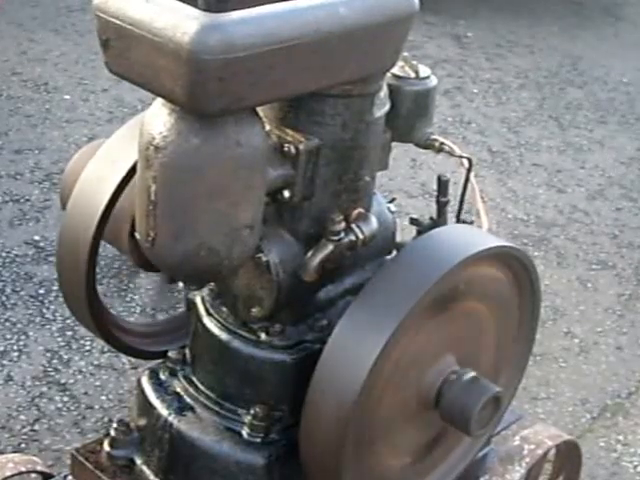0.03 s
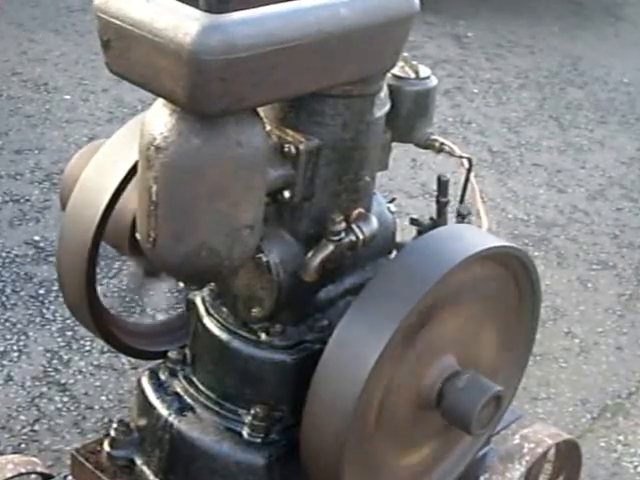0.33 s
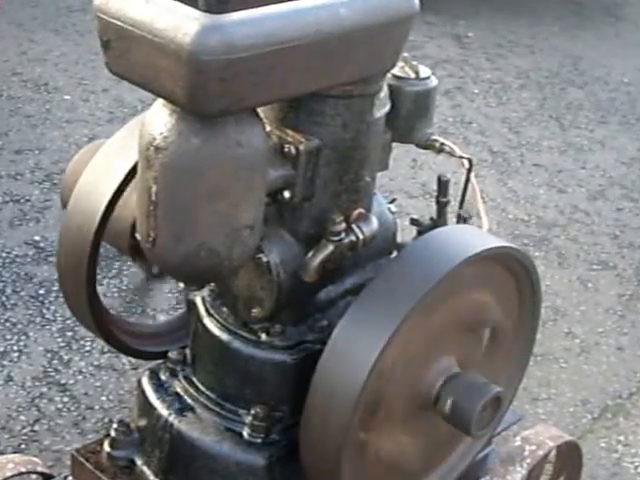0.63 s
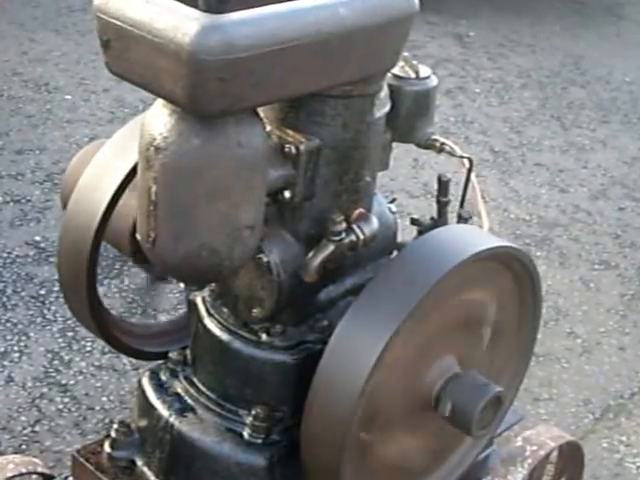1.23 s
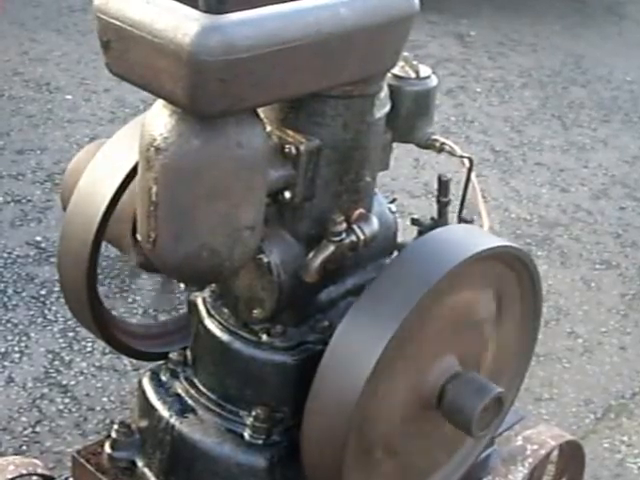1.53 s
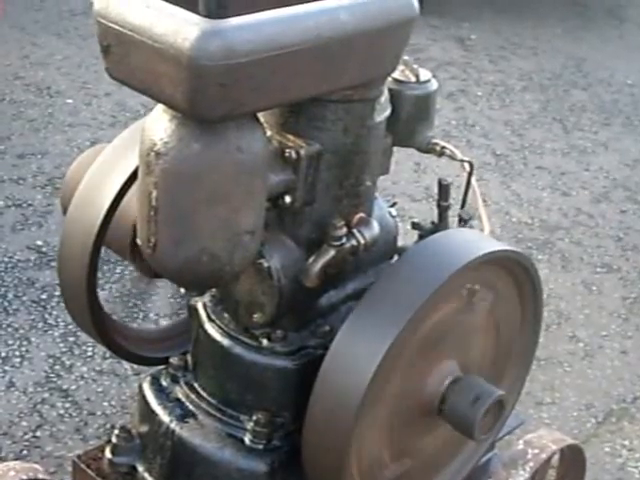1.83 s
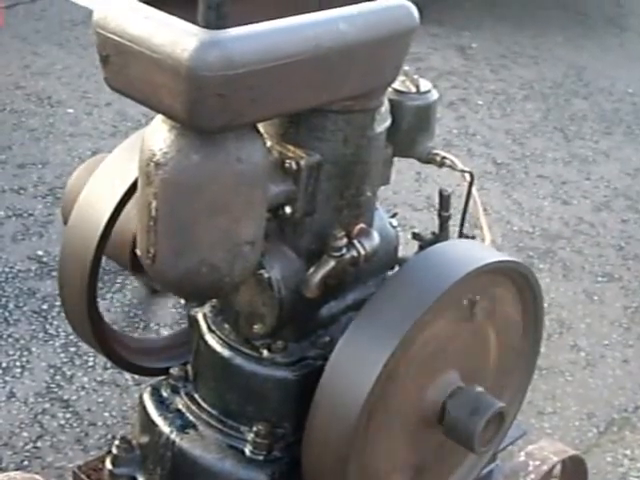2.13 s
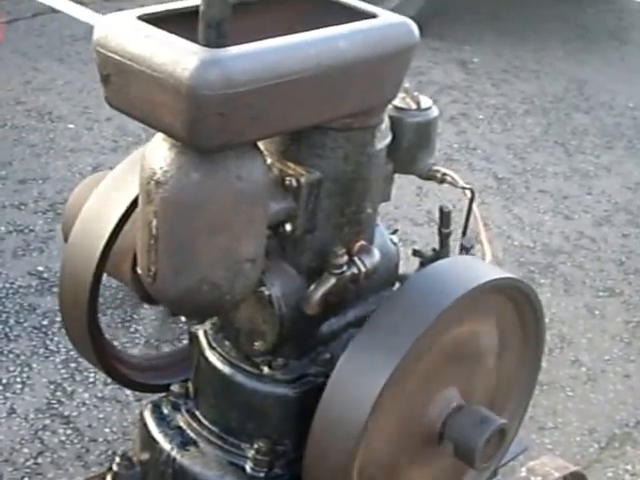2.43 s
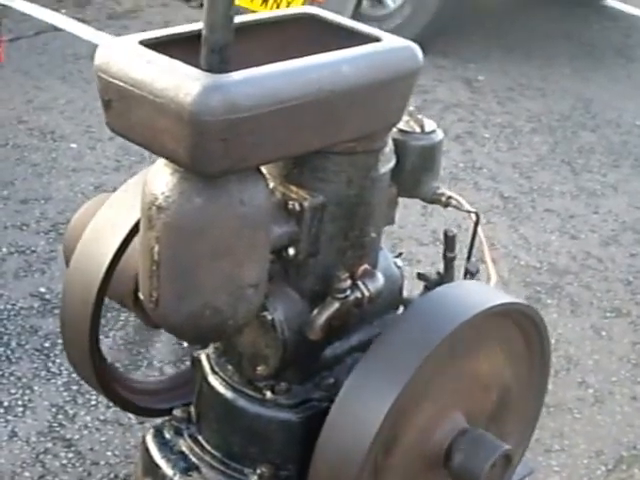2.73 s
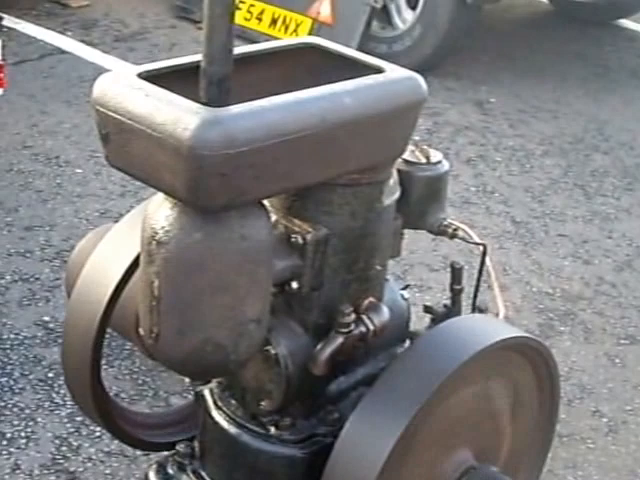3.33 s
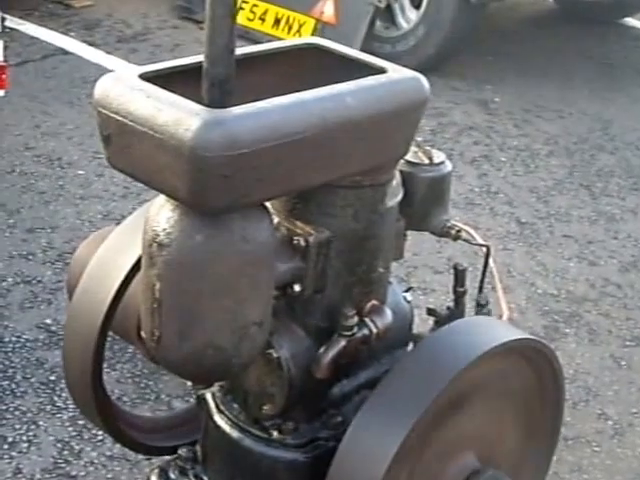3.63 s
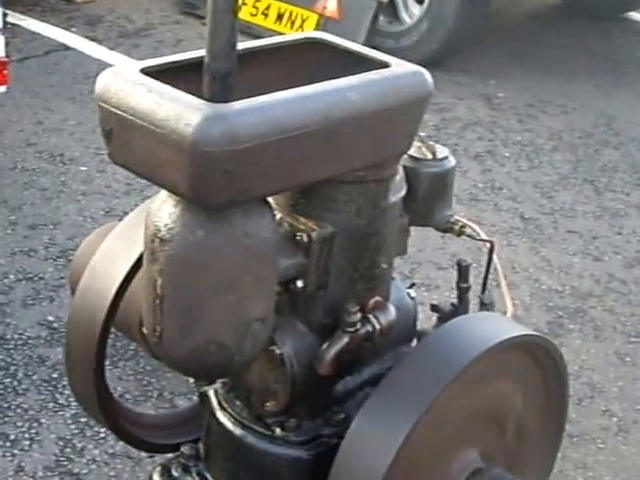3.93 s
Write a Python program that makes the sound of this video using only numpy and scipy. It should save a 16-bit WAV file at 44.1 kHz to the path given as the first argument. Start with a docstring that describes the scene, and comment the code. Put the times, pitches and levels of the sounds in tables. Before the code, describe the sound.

An old stationary engine chugs quickly close by, ticking and clanking, with occasional harsh bangs.

```python
"""An old single-cylinder stationary engine runs close by on the tarmac of a showground.
Each turn displaces air in a low gulp, with a linkage clack, a sharp valve tick and a little hiss.
Loose metal knocks on some turns, and now and then a firing excites the iron castings with a harsh bang.
A second engine putts faster a little way off, echoing from parked vehicles over the din of the show.
The bangs overload the microphone."""
import sys
import numpy as np
from scipy import signal
from scipy.fft import rfft, irfft
from scipy.io import wavfile

SR = 44100
rng = np.random.default_rng(int(sys.argv[2]) if len(sys.argv) > 2 else 0)


def put_to_file(sound):
    """Save the sound as 16-bit audio at rate SR, in the file named by the first command-line argument."""
    columns = np.atleast_2d(sound).T  # one column per channel
    safe = np.clip(columns, -1, 1)
    whole_steps = np.round(safe * 32767)
    wavfile.write(sys.argv[1], SR, whole_steps.astype(np.int16))


N = 176400
TIME = np.arange(N) / SR

# turns of the near engine: (time [s], gulp level [dB], valve tick level [dB])
TURNS = [(0.039, 0.5, -1.5), (0.164, -4, -2), (0.287, 1, 1.5), (0.413, -1, 1), (0.542, 2.5, 0),
         (0.673, -0.5, -2.5), (0.792, 2, -2), (0.91, 5.5, 3.5), (1.037, 5, -1.5), (1.155, 1.5, -3),
         (1.274, -2, 0.5), (1.395, -0.5, -1), (1.520, 3.5, -3), (1.646, 0, -1.5), (1.761, 2, 7.5),
         (1.889, -1, -2), (2.011, 2, -1), (2.131, -5, -1.5), (2.243, 2, 4), (2.357, 5, 2), (2.481, 5.5, 3),
         (2.593, -8, -3), (2.709, 3, -2.5), (2.827, 3.5, -2.5), (2.947, -2.5, -1), (3.068, 1.5, -0.5),
         (3.192, 1.5, -1), (3.318, 4, -2.5), (3.449, -0.5, 0), (3.578, 0.5, -0.5), (3.712, 1, -3),
         (3.83, 0.5, 3.5), (3.955, 2.5, -5)]
# spectrum of a firing's bark and of the linkage clack: (frequency [Hz], level [dB])
BARK_SPECTRUM = [(150, -16.5), (400, 0.5), (540, 5.5), (830, -3.5), (990, 6), (1350, 0), (2000, 2.5),
                 (3000, 4), (6000, -15)]
# spectrum of a puff of gas: (frequency [Hz], level [dB])
CHUFF_SPECTRUM = [(200, 5), (650, -2.5), (1200, 3.5), (2000, -5), (3000, -4.5), (6000, -25)]


def from_db(db):
    """Amplitude grows tenfold for every 20 dB."""
    return 10 ** (np.asarray(db) / 20)


def unit_rms(x):
    """Normalisation to unit mean power."""
    return x / np.sqrt(np.mean(x ** 2) + 1e-20)


def drift(hz):
    """Low-pass filtered noise gives a random fluctuation of unit rms."""
    lowpass = signal.butter(2, hz, fs=SR, output="sos")
    return unit_rms(signal.sosfilt(lowpass, rng.standard_normal(N + SR))[SR:])


def noise(spectrum, grain_db=3, top_hz=6520):
    """Random amplitude modulation makes noise grainy; spectral shaping colours it, at unit rms."""
    hz, db = np.transpose(spectrum)
    f = np.maximum(np.arange(N // 2 + 1) * SR / N, 1)
    grains = rng.standard_normal(N) * from_db(grain_db * drift(400))
    gain = from_db(np.interp(np.log(f), np.log(hz), db)) * (f > 10) * (f < top_hz)
    return unit_rms(irfft(rfft(grains) * gain, N))


def bursts(times, dbs, attack_s, hold_s, decay_s):
    """Incoherent events add in power; each envelope rises, holds and decays exponentially."""
    power = np.zeros(N)
    for s, db in zip(times, dbs):
        start = max(int(s * SR), 0)
        age = np.maximum(TIME[start:start + SR // 2] - s, 0)
        rise = np.minimum(age / attack_s, 1)
        fall = np.exp(-np.maximum(age - attack_s - hold_s, 0) / decay_s)
        power[start:start + len(age)] += (from_db(db) * rise * fall) ** 2
    return np.sqrt(power)


def iron_castings(force, ring_db):
    """Modal resonance: a force is heard directly and through the damped modes of the castings."""
    # modes of the iron: (frequency [Hz], bandwidth [Hz], level [dB])
    modes = [(745, 17, -1.5), (980, 65, 0.5), (1219, 61, 4.5), (1658, 14, 12.5), (1942, 52, 3),
             (2182, 30, 5), (2620, 91, 1), (3170, 26, -6), (4220, 64, -1), (4544, 35, 1.5), (4760, 34, 2.5),
             (4950, 38, -8), (5420, 25, -6.5)]
    ringing = 0
    for hz, width, db in modes:
        radius = np.exp(-np.pi * width / SR)
        numerator = np.array([1, 0, -1]) * (1 - radius ** 2) / 2
        denominator = [1, -2 * radius * np.cos(2 * np.pi * hz / SR), radius ** 2]
        ringing += from_db(db) * signal.lfilter(numerator, denominator, force + 1e-18)
    return force + from_db(ring_db) * ringing


def showground_din(level_db=-19, flutter_db=2.0):
    """Superposition: other machinery blends into a steady, slightly fluttering noise."""
    # spectrum of the din: (frequency [Hz], level [dB])
    din_spectrum = [(20, 9.5), (45, 14), (80, 2.5), (110, 8.5), (155, 7.5), (220, 3.5), (300, -0.5),
                    (380, 1), (480, -4), (680, 2.5), (830, -5.5), (1000, -4), (1200, -5), (1500, -9.5),
                    (2250, -14), (3200, -9.5), (6100, -21)]
    return from_db(level_db + flutter_db * drift(14.6)) * noise(din_spectrum, grain_db=1.5)


def running_rush(level_db=-27, flicker_db=3, lull_db=-10, lead_s=0.012, width_s=0.028):
    """Amplitude modulation: the moving parts rush unevenly and hush just before each valve tick."""
    # spectrum of the moving parts: (frequency [Hz], level [dB])
    rush_spectrum = [(1000, -9.5), (2300, 1.5), (3100, 0), (3500, -2.5), (4300, 4.5), (5000, 2),
                     (6100, -2.5)]
    lull = sum(np.exp(-np.minimum(((TIME - s + lead_s) / width_s) ** 2, 20)) for s, _, _ in TURNS)
    envelope = from_db(level_db + lull_db * lull + flicker_db * drift(81))
    return iron_castings(envelope * noise(rush_spectrum), ring_db=-6)


def linkage_clatter(level_db=-23, spread_db=2.0, lead_s=0.0296, scatter_s=0.0066):
    """Impact noise: the linkage clacks lightly ahead of every valve tick, with random timing jitter."""
    jitter, strength = rng.standard_normal((len(TURNS), 2)).T
    times = np.array(TURNS)[:, 0] - lead_s + scatter_s * jitter
    dbs = level_db + spread_db * strength
    return bursts(times, dbs, attack_s=0.0004, hold_s=0.0033, decay_s=0.0089) * noise(BARK_SPECTRUM)


def far_engine(thump_db=-8, pipe_hz=190.4, pitch_scatter=0.055, swell_s=0.003, spit_db=-23):
    """Pulse radiation: each exhaust beat is a thump and a spit of gas; reflections return as echoes."""
    # exhaust beats: (time [s], level [dB])
    putts = [(0.024, -7.5), (0.111, 1.5), (0.188, -5), (0.266, 2), (0.344, 1), (0.422, 0.5), (0.5, 2),
             (0.578, -0.5), (0.657, -8), (0.735, -3.5), (0.819, -5), (0.897, 0.5), (0.977, -4.5),
             (1.056, -1), (1.136, -0.5), (1.216, -1), (1.294, 1.5), (1.372, -3), (1.453, 1), (1.532, 0),
             (1.612, -0.5), (1.69, 0.5), (1.774, -6), (1.85, -0.5), (1.931, 0), (2.01, 0), (2.089, -0.5),
             (2.166, -2), (2.243, -7), (2.327, -4.5), (2.407, -1), (2.486, -2), (2.564, 0.5), (2.647, -1),
             (2.729, -4.5), (2.811, 1.5), (2.895, -2), (2.98, -1.5), (3.066, -0.5), (3.153, -5), (3.237, 2),
             (3.317, -0.5), (3.399, -1), (3.48, 1.5), (3.556, 1), (3.634, 0.0), (3.709, 0.5), (3.781, 1.5),
             (3.854, -1.5), (3.925, -1.5), (3.997, 0)]
    # reflections off parked vehicles: (delay [s], level [dB])
    echoes = [(0.019, -12), (0.03, -11.5)]
    times, dbs = np.transpose(putts)
    pitch, strength = rng.standard_normal((len(times), 2)).T
    spit_dbs = spit_db + dbs + 6.0 * np.tanh(strength)
    spits = bursts(times - 0.001, spit_dbs, attack_s=0.0016, hold_s=0.0031, decay_s=0.0056)
    exhaust = spits * noise(CHUFF_SPECTRUM)
    for s, db, hz in zip(times, dbs, pipe_hz * np.exp(pitch_scatter * pitch)):
        start = max(int(s * SR) - SR // 50, 0)
        t = TIME[start:start + SR // 25] - s
        swell = from_db(thump_db + db) * np.exp(-0.5 * (t / swell_s) ** 2)
        exhaust[start:start + len(t)] += swell * np.cos(2 * np.pi * hz * t)
    return exhaust + sum(from_db(db) * np.interp(TIME - lag, TIME, exhaust, left=0) for lag, db in echoes)


def air_gulps(level_db=-11.5, width_s=0.0046, lag_s=0.0053, low_cut_hz=14):
    """Volume displacement: each turn pushes air out and sucks it back in one slow pressure swing."""
    pressure = np.zeros(N)
    for s, db, _ in TURNS:
        u = np.clip((TIME - s - lag_s) / width_s, -10, 10)
        pressure -= from_db(level_db + db) * u * np.exp((1 - u * u) / 2)  # derivative of a Gaussian
    return signal.sosfilt(signal.butter(1, low_cut_hz, "high", fs=SR, output="sos"), pressure)


def valve_gear(tick_db=-11, chuff_db=-23, hiss_db=-28, chuff_lag_s=0.015, hiss_lag_s=0.038):
    """Impact and turbulence: a tick rings the iron on every turn, then escaping air chuffs and hisses."""
    # spectrum of the valve's impact: (frequency [Hz], level [dB])
    tick_spectrum = [(500, -46.5), (2200, -12), (3000, 0), (3500, -1.5), (4150, 5), (4500, 0), (5100, 1),
                     (5520, 10), (6100, -8)]
    # spectrum of the escaping air: (frequency [Hz], level [dB])
    hiss_spectrum = [(600, -4.5), (2200, 7), (3100, 0), (4400, 5.5), (5200, -12.5), (5520, 10.5),
                     (6100, -1)]
    times, _, dbs = np.transpose(TURNS)
    chuff_dbs = chuff_db + rng.normal(0, 0.74, len(times))
    hiss_dbs = hiss_db + rng.normal(0, 4.6, len(times))
    tick = bursts(times, tick_db + dbs, attack_s=0.001, hold_s=0.0015, decay_s=0.0057)
    chuff = bursts(times + chuff_lag_s, chuff_dbs, attack_s=0.011, hold_s=0.0021, decay_s=0.016)
    hiss = bursts(times + hiss_lag_s, hiss_dbs, attack_s=0.0059, hold_s=0.021, decay_s=0.0046)
    ringing_tick = iron_castings(tick * noise(tick_spectrum, grain_db=0.5), ring_db=-3)
    return ringing_tick + chuff * noise(CHUFF_SPECTRUM) + hiss * noise(hiss_spectrum)


def metal_knocks(knock_db=-14, clank_db=-16):
    """Backlash: loose metal takes up its play with a rattling knock and a clank of varying strength."""
    # impacts: (time [s], knock level [dB], clank level [dB])
    knocks = [(.282, -2.5, -8), (0.398, 1, 3), (0.514, .5, 0), (0.637, -5, -6), (1.514, -3, -8),
              (1.63, 0, -4), (2.159, -5, -12), (2.68, -6, -16), (3.188, -3, -4), (3.302, 1, -1),
              (3.421, 1, 0), (3.475, -5, -14), (3.543, -7, -10)]
    # broad spectrum of the knock: (frequency [Hz], level [dB])
    knock_spectrum = [(300, -17), (700, 0.5), (1250, 9), (1500, 7.5), (1950, 5.5), (2250, -23.5),
                      (2800, 13.5), (3300, 8), (4200, 1), (6100, -0.5)]
    # two-peaked spectrum of the clank: (frequency [Hz], level [dB])
    clank_spectrum = [(2300, -19), (2620, 16.5), (2900, -27), (3500, -29), (4250, -24), (4490, 6),
                      (4750, -17.5), (6100, -25)]
    times, knock_dbs, clank_dbs = np.transpose(knocks)
    knock = bursts(times, knock_db + knock_dbs, attack_s=0.001, hold_s=0.0044, decay_s=0.0078)
    clank = bursts(times, clank_db + clank_dbs, attack_s=0.001, hold_s=0.0066, decay_s=0.011)
    rattle = iron_castings(knock * noise(knock_spectrum, grain_db=1), ring_db=-4)
    return rattle + clank * noise(clank_spectrum, grain_db=0)


def firing_bangs(blast_db=-11.5, bark_db=-14.5, bark_lead_s=0.0033):
    """Broadband excitation: a firing's sudden bark and harsh blast of gas set the iron ringing."""
    # firings: (time [s], blast level [dB], bark level [dB], blast hold [s], blast decay [s])
    firings = [(0.779, 4, 1.5, 0.024, 0.025), (0.9, 0.5, -4.5, 0.014, 0.023), (1.743, 4.5, 1, 0.022, 0.029),
               (2.229, 4, 1.5, 0.019, 0.03), (2.348, 2.5, -4.5, 0.011, 0.02), (3.819, 3, 1, 0.03, 0.014),
               (3.942, 0, -3, 0.015, 0.013)]
    # spectrum of the gas blast: (frequency [Hz], level [dB])
    blast_spectrum = [(300, -3), (1500, -13.5), (2400, -14), (3000, 7), (3500, 3.5), (4200, 5), (4700, 5.5),
                      (5150, 5.5), (6100, 3)]
    blast, bark = 0, 0
    for s, blast_gain_db, bark_gain_db, hold_s, decay_s in firings:
        blast += bursts([s], [blast_db + blast_gain_db], attack_s=0.011, hold_s=hold_s, decay_s=decay_s)
        bark += bursts([s - bark_lead_s], [bark_db + bark_gain_db],
                       attack_s=0.0062, hold_s=0.009, decay_s=0.049)
    gas = blast * noise(blast_spectrum, grain_db=0) + bark * noise(BARK_SPECTRUM, grain_db=1.5)
    return iron_castings(gas, ring_db=0)


def scene():
    """Linear superposition: the pressures of both engines and the din add in one channel."""
    turning = air_gulps() + valve_gear() + linkage_clatter() + running_rush()
    near_engine = turning + metal_knocks() + firing_bangs()
    return (near_engine + far_engine() + showground_din())[None]


def record(dry, mic_top_hz=6020, notch_hz=(3540, 3980), cutoff_hz=15800):
    """Saturation: a narrow-band microphone with a treble notch clips the bangs; the top is then cut."""
    mic_band = signal.ellip(12, 0.2, 90, mic_top_hz, fs=SR, output="sos")
    notch = signal.butter(3, notch_hz, "bandstop", fs=SR, output="sos")
    top_cut = signal.ellip(10, 0.1, 70, cutoff_hz, fs=SR, output="sos")
    picked_up = signal.sosfilt(notch, signal.sosfilt(mic_band, dry))
    return signal.sosfilt(top_cut, np.clip(picked_up, -1, 1))


dry = scene()
out = record(dry)
put_to_file(out)
```